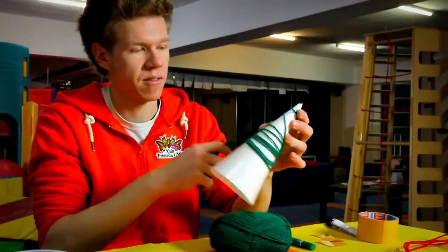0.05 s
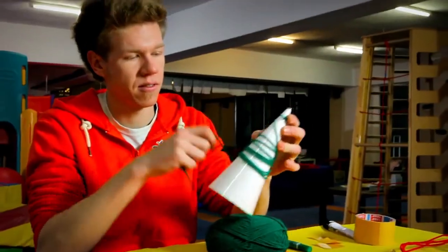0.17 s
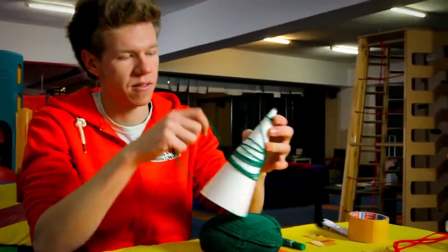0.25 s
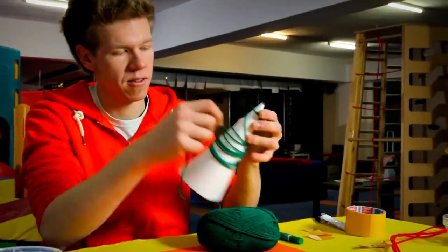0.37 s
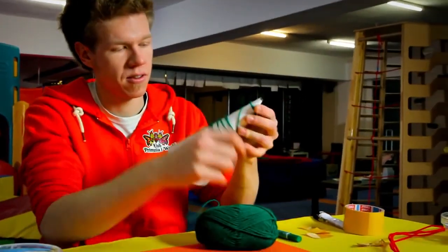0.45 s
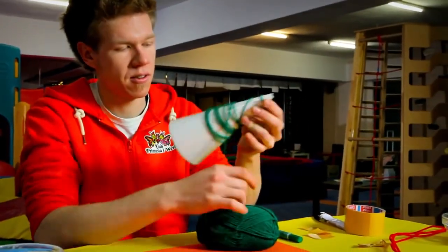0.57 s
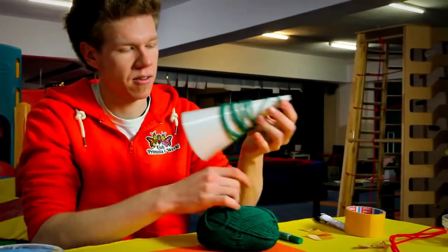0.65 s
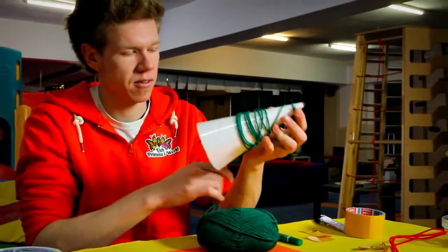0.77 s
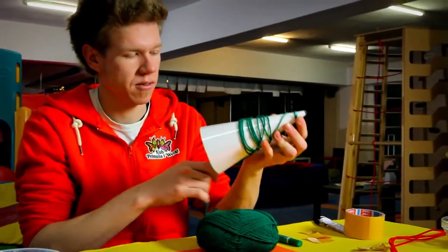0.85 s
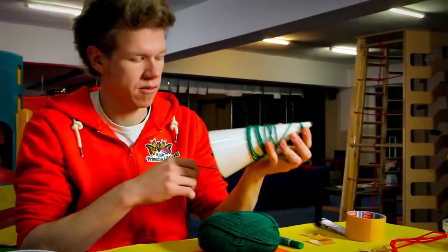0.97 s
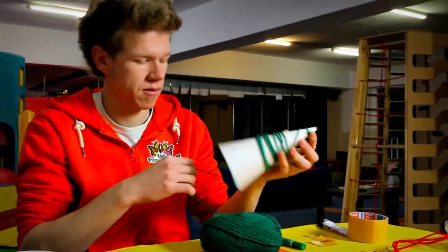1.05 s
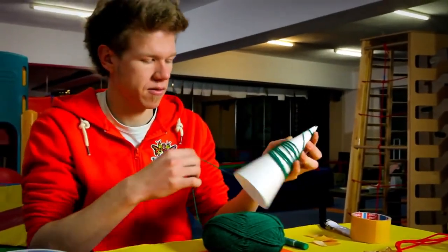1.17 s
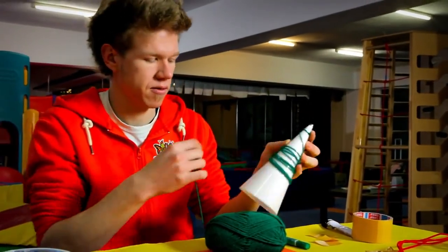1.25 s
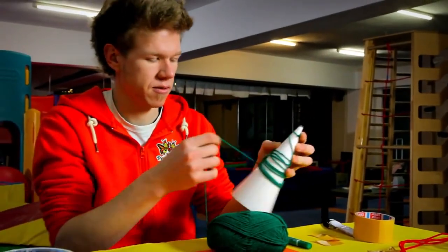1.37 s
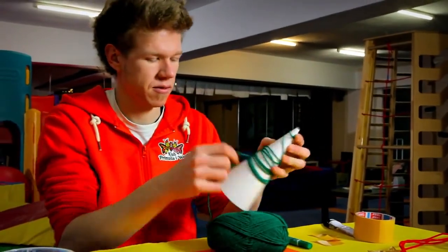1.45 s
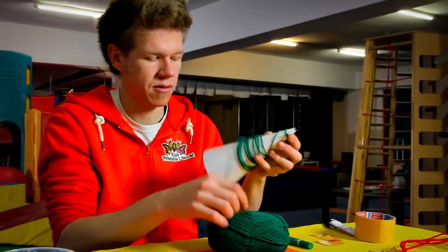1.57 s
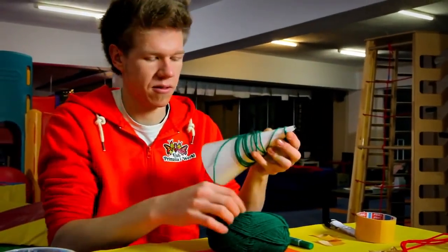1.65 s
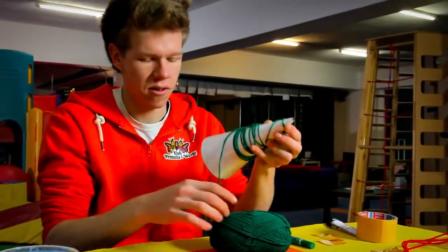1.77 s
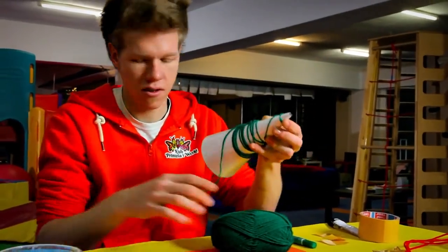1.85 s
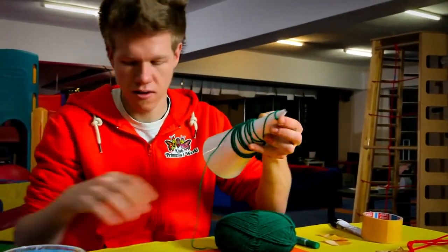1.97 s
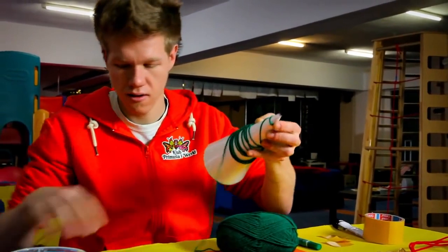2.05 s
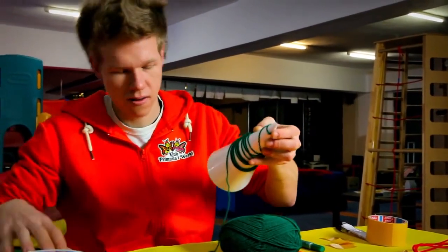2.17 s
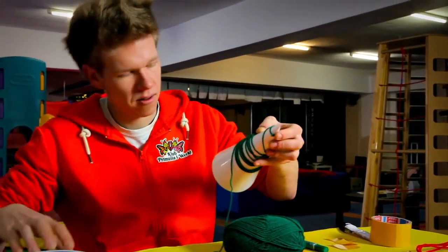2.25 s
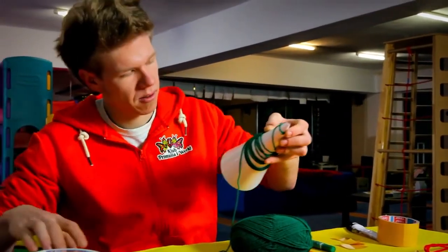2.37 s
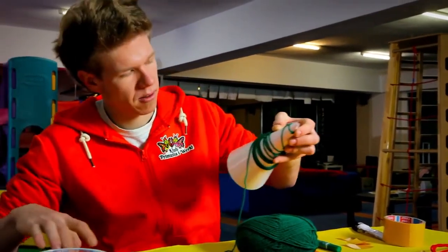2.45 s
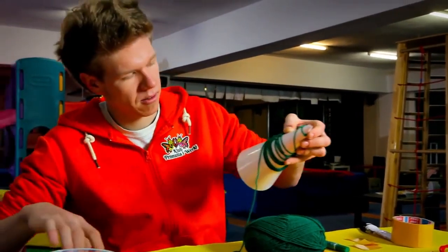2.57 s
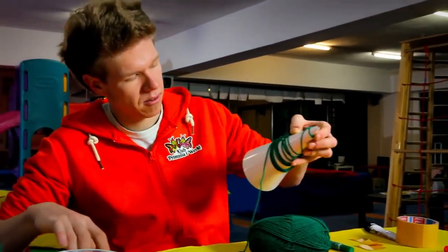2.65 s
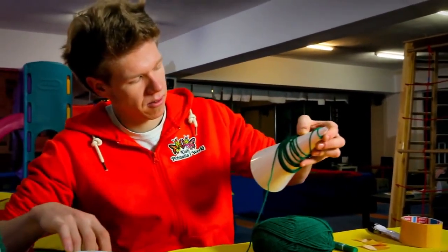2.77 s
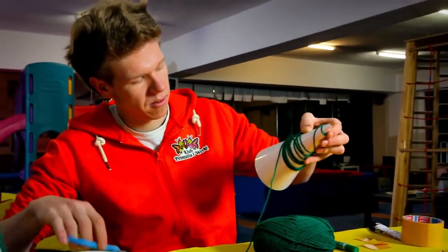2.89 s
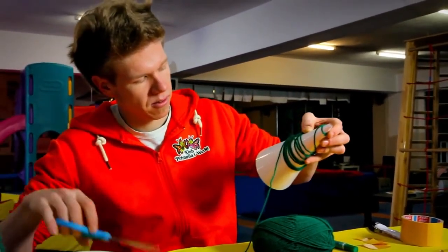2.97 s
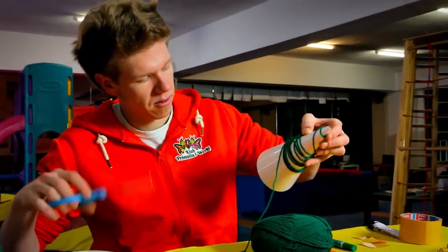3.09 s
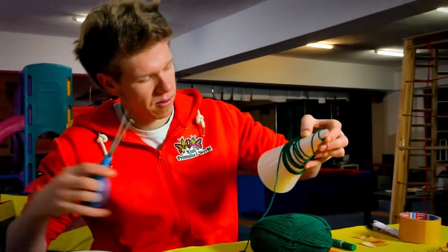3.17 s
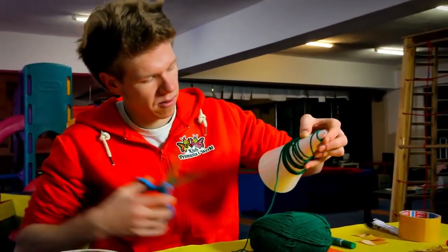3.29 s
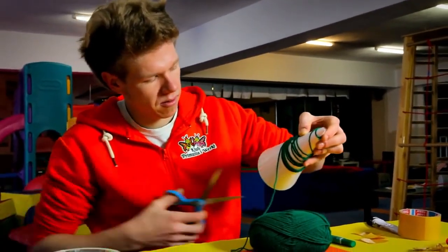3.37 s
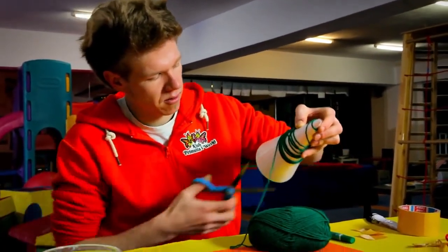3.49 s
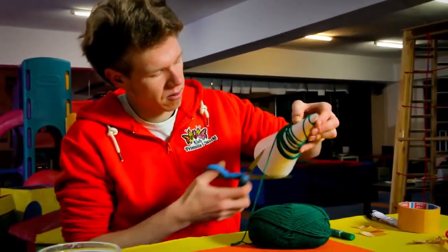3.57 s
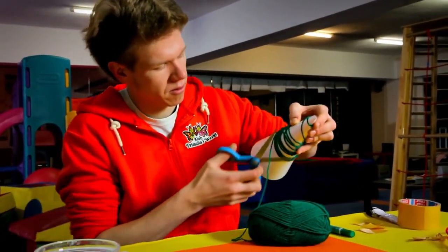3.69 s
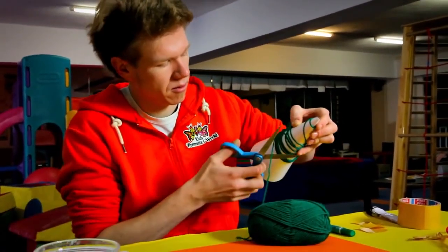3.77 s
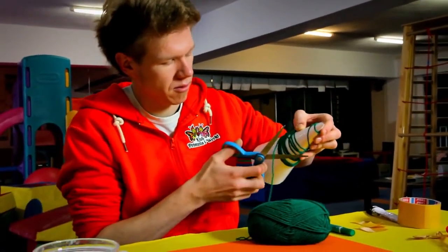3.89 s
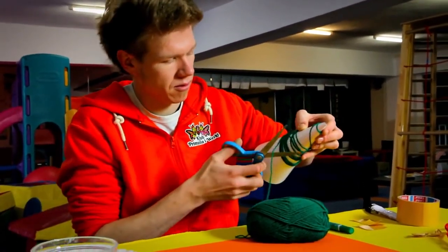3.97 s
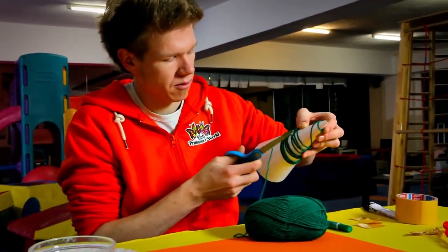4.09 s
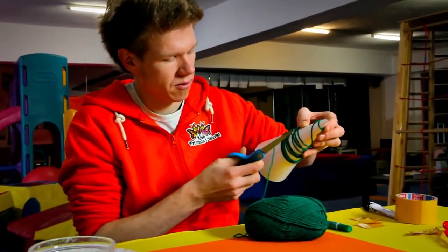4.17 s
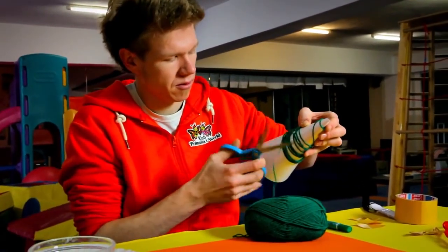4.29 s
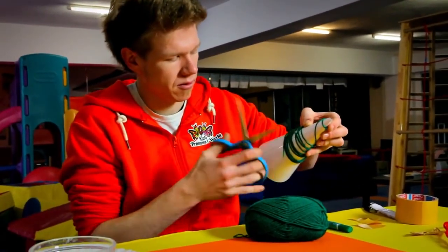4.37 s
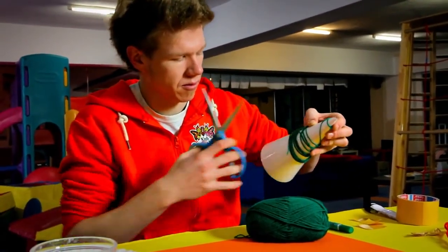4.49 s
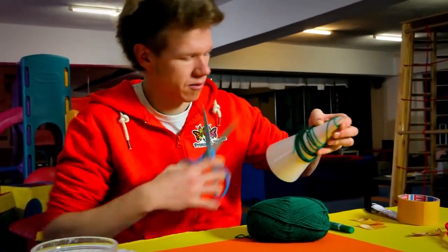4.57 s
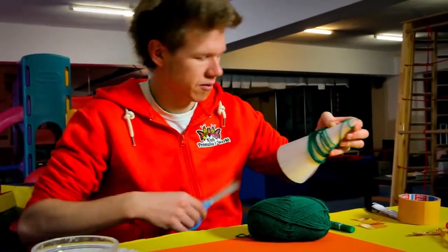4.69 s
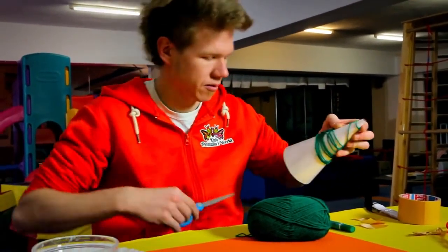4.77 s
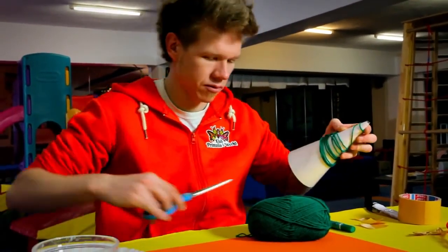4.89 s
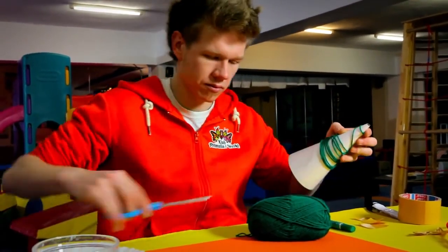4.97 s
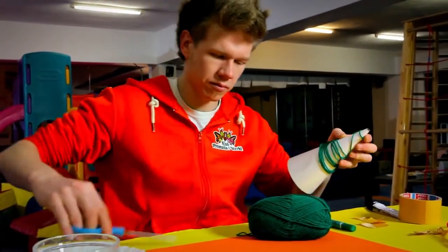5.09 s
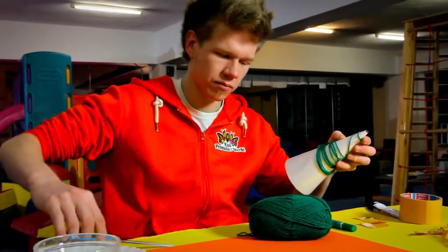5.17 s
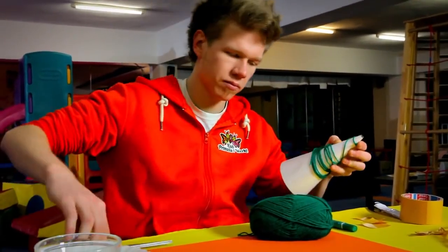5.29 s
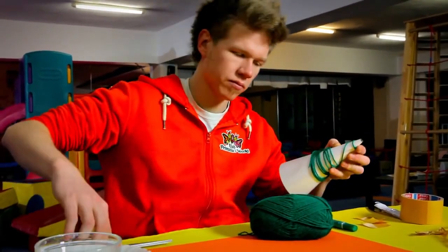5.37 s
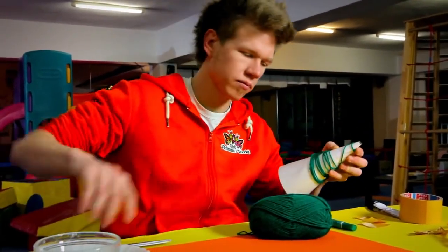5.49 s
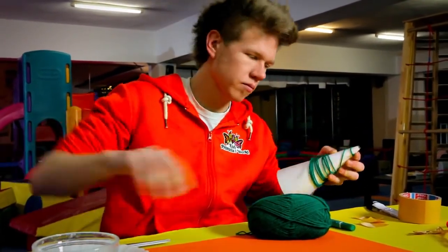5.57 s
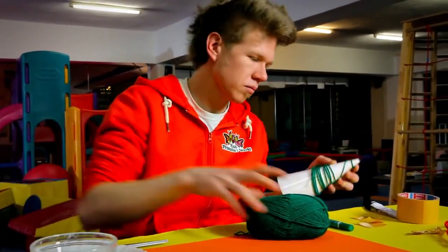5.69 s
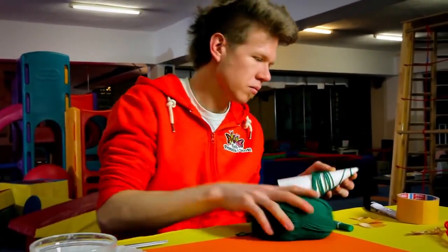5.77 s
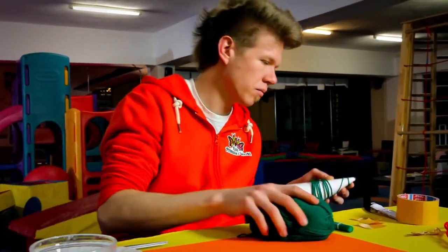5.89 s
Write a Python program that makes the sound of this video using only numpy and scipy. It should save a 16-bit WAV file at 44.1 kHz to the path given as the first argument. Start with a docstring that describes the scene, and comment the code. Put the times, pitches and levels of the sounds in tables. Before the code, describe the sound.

Yarn rubs faintly as it is wound on a paper cone, with a few light taps. Scissors knock and scrape on a table as they are picked up, their steel blades ringing briefly. They snip softly through the yarn, click shut, and are put down with two loud knocks. The sounds are fairly near, slightly left, in a quiet, mildly echoing hall with a steady low hiss and hum.

```python
"""Scissors knock on a craft table in a quiet hall: they are dragged off it with ringing blades, snip
through yarn, click shut, and are put down with two loud knocks. Each impact excites the damped modes
of the table top or the steel blades. Friction, a train of tiny slips, makes the rasp of the edges, the
scuff of the handles and the faint rub of yarn being wound on a paper cone. Cone and handles are tapped.
Soft low thumps sound now and then, over a steady hiss and the hum of lamps and ventilation."""
import sys
import numpy as np
from scipy import signal
from scipy.fft import rfft, irfft, next_fast_len
from scipy.io import wavfile

SR = 44100
rng = np.random.default_rng(int(sys.argv[2]) if len(sys.argv) > 2 else 0)


def store_pcm(level_fs):
    """Save levels as 16-bit WAV."""
    pcm = np.round(np.clip(level_fs, -1, 1) * 32767).astype(np.int16)
    wavfile.write(sys.argv[1], SR, np.atleast_2d(pcm).T)


N = 261865
TIME = np.arange(N) / SR


def table_knocks():
    """Impact excitation: a shorter force pulse sounds brighter, and its place weights the modes."""
    # The scissors strike and bounce. Each row: start in seconds, gain in dB, pulse corner in Hz,
    # gain of the modes in dB, place from 0 (edge) to 1 (middle), clatter t60 in seconds.
    impacts = [(2.264, -32, 513, 8, 0.71, 0.081), (2.2751, -24.5, 450, 3.5, 0, 0.035),
               (2.3178, -30.5, 1290, -28, 0.54, 0.058), (2.3263, -19, 417, -9, 0.3, 0.085),
               (2.675, -24.5, 292, 7, 0.88, 0.053), (5.1881, -19.5, 2250, 6, 0.11, 0.0412),
               (5.2067, -26, 1100, 2, 0.3, 0.039), (5.3529, -11.5, 3820, -0.5, 1, 0.057),
               (5.3535, -10, 15100, -15, 0.62, 0.031), (5.367, -23.5, 9000, -16, 1, 0.025),
               (5.3712, -24, 5000, -10, .5, 0.023), (5.378, -18, 1000, -3.5, 1, 0.029),
               (5.4, -19.5, 1300, -15, 0.36, 0.065)]
    # Modes of the table top with the plastic handles on it. Each row: frequency in Hz,
    # level in dB when struck at the edge, level in dB when struck in the middle, t60 in seconds.
    table_modes = [(130, -43, -37, 0.8), (160, -37, -40, 0.38), (232, -31, -26, 0.27), (390, -42, -29, 0.6),
                   (485, -27, -31, 0.22), (537, -20, -23, 0.09), (563, -32, -24, .18),
                   (639, -25, -26, 0.12), (784, -50, -33, 0.35), (997, -36, -30, 0.25),
                   (1055, -34, -25.5, 0.21), (1097, -17, -20, 0.05), (1282, -50, -33, .3),
                   (1570, -6, -7, .012), (1615, -29, -26, .13), (1671, -31, -27, .14), (1820, -33, -31, .2),
                   (1951, -37, -28, .15), (2560, -17, -9, 0.025), (2990, -19, -10, 0.025)]
    # Spectrum of the clatter. Each row: frequency in Hz, gain in dB.
    clatter_spectrum = [(60, -14), (100, -11), (170, -11), (320, -11), (480, 0.5), (900, -2), (1500, 4),
                        (2100, 2.5), (2900, -3.5), (3500, -6.5), (5000, -9.5), (7500, -7.5), (9500, -13.5),
                        (11500, -32), (15000, -42)]
    out, t = np.zeros((2, N)), TIME[:SR // 100]
    for start, db, corner_hz, ring_db, place, clatter_t60 in impacts:
        modes = [(hz, np.interp(place, [0, 1], [edge, middle]), t60)
                 for hz, edge, middle, t60 in table_modes]
        force = t * np.exp(-2 * np.pi * corner_hz * t)
        response = amp(ring_db) * modal_response(modes) + dense_modes(clatter_spectrum, clatter_t60)
        add(out, start, amp(db) * hall(convolve(response, force / force.sum())))
    return out


def blade_clinks():
    """Free vibration: the loose blades collide and ring on in their bending modes."""
    # Each row: start in seconds, gain in dB, lowest and highest excited frequency in Hz,
    # ring of the upper and of the lower blade in dB.
    contacts = [(2.2624, -22.5, 1450, 4150, -3.5, -8), (2.269, -39, 4570, 6800, -2, -6),
                (2.2735, -37, 4560, 7540, 12, -6), (2.3168, -37, 1090, 7000, 5, 15),
                (2.3216, -24.5, 4000, 4900, -14, -10), (2.6698, -35.5, 1080, 3040, 10.5, -27),
                (2.673, -40.5, 2500, 9000, -27, -20)]
    # Modes of each blade. Each row: frequency in Hz, level in dB, t60 in seconds.
    upper_blade = [(1163, -31.5, 1.3), (1880, -40.5, .9), (2744, -23, .32), (3790, -22, .085),
                   (4890, -23, .085), (6130, -28, .07), (6260, -28, .07), (7560, -28, .09)]
    lower_blade = [(1265, -37, .9), (4452, -35, .15), (6650, -35, .07)]
    # Spectrum of the contact tick. Each row: frequency in Hz, gain in dB.
    tick_spectrum = [(100, -48), (400, -16), (1200, -18), (2400, -2.5), (3900, -0.5), (4700, -3.5),
                     (7500, -1.5), (9000, -3), (12000, -24), (15000, -50)]
    return steel_impacts(contacts, [upper_blade, lower_blade], tick_spectrum, tick_t60=0.015)


def blade_squeak(flutter=0.35, flutter_hz=120):
    """Stick-slip friction: a blade dragged over the table sings unsteadily in its high modes."""
    # The blade presses harder until it slips free.
    # Each row: time of the peak in seconds, level in dB, length in seconds.
    drags = [(2.642, -39, 0.044)]
    # Modes of the pressed blade. Each row: frequency in Hz, relative level in dB.
    pressed_modes = [(1975, 0), (3750, 1.5), (4890, 3), (6180, 0), (7520, -7)]
    lowpass = signal.butter(2, flutter_hz, fs=SR, output="sos")
    squeak = np.zeros(N)
    for hz, db in pressed_modes:
        tremor, phase_drift = flutter * unit_rms(signal.sosfilt(lowpass, rng.standard_normal((2, N))))
        squeak += amp(db) * (1 + tremor) * np.sin(2 * np.pi * hz * TIME + phase_drift)
    return envelope(drags, roundness=0.53) * unit_rms(squeak)


def held_scissors(ring_db=-17):
    """Forced vibration: the sliding edges set the blades ringing; the blades snap shut."""
    # The edges rasp past each other, at pick-up and while snipping; their crossing point sets the pitch.
    # Each row: time of the peak in seconds, level in dB, length in seconds, pitch in Hz.
    edge_slides = [(2.677, -54, .04, 4770), (4.098, -67.5, 0.057, 4100), (4.11, -65, 0.11, 7700),
                   (4.133, -54, 0.024, 9700), (4.15, -60, 0.066, 5460), (4.286, -53, 0.05, 6650),
                   (4.763, -57, 0.037, 7860), (4.79, -62.5, 0.048, 3460)]
    # The blades snap through, shut and rattle at the pivot. Each row: start in seconds, gain in dB,
    # lowest and highest excited frequency in Hz, ring in dB.
    snaps = [(3.324, -48, 2800, 7500, -15), (3.4195, -46, 600, 7000, -18), (3.5655, -39, 6200, 7900, -14),
             (4.1322, -44, 3000, 14000, -10), (4.1345, -39, 300, 13000, 9), (4.148, -41, 1500, 13000, -2),
             (4.2742, -36.5, 2940, 12000, -21), (4.295, -42, 2200, 3000, 1),
             (4.7861, -45, 6000, 13500, -16), (4.7915, -47, 1000, 11000, -16),
             (4.7925, -50, 3000, 3960, 12), (5.291, -51, 2500, 12000, -12)]
    # Blades damped by the hand and by each other; close modes beat.
    # Each row: frequency in Hz, level in dB, t60 in seconds.
    held_modes = [(2320, -16, 0.018), (2430, -18, .025), (3220, -17, .016), (3430, -22, 0.026),
                  (5440, -23, .06), (5600, -26, 0.11), (5692, -24.5, .17), (5755, -26, 0.15),
                  (6000, -24, 0.035), (8300, -22, 0.025)]
    # Spectra of the rasp and of the contact tick. Each row: frequency in Hz, gain in dB.
    rasp_spectrum = [(100, -47), (1000, 0), (2500, 0), (4500, 2.5), (6000, 1.5), (8300, 0.5), (10500, -9.5),
                     (13000, -24), (15000, -39)]
    tick_spectrum = [(100, -34), (400, 1.5), (1000, -7.5), (2500, -0.5), (6000, -5.5), (8400, -1.5),
                     (10500, -13), (13000, -15), (15000, -38)]
    rasp = friction(edge_slides, rasp_spectrum, slips_per_s=5000, spread_db=2.5, hump_db=7, octaves=0.3)
    blades = modal_response(held_modes)
    ringing = amp(ring_db) * convolve(rasp, blades / np.linalg.norm(blades))
    return steel_impacts(snaps, [held_modes], tick_spectrum, tick_t60=0.018) + rasp + ringing


def handle_scuff():
    """Sliding friction: the plastic handles rasp over the table top."""
    # Each row: time of the peak in seconds, level in dB, length in seconds, pitch in Hz.
    slides = [(2.642, -48.5, 0.058, 560), (2.664, -52, 0.051, 1300), (2.697, -59.5, 0.14, 612)]
    # Spectrum of plastic on the table. Each row: frequency in Hz, gain in dB.
    spectrum = [(100, -12), (250, -4), (550, -6.5), (1000, -3.5), (1700, -2), (2600, -10.5), (4500, -9),
                (8000, -16), (11000, -29), (14000, -51)]
    return friction(slides, spectrum, slips_per_s=4000, spread_db=0.5, hump_db=9.5, octaves=0.59)


def yarn_rub():
    """Sliding friction: yarn fibres rasp on the paper cone, and a hand brushes the ball."""
    # Each row: time of the peak in seconds, level in dB, length in seconds, pitch in Hz.
    rubs = [(0.35, -67.5, 0.21, 4370), (0.64, -67.5, 0.18, 2240), (0.773, -55, 0.044, 5270),
            (1.105, -64, 0.21, 7300), (1.16, -65, 0.072, 750), (1.28, -67.5, 0.048, 4800),
            (3.335, -65, 0.099, 900), (3.44, -69, 0.28, 805), (5.89, -62.5, 0.45, 6860)]
    # Spectrum of the rubbing fibres. Each row: frequency in Hz, gain in dB.
    spectrum = [(80, -9), (200, 14), (400, -3), (750, 8), (1200, 2), (2500, 1.5), (5500, -3), (7500, -2),
                (9000, -13.5), (12000, -33)]
    return friction(rubs, spectrum, slips_per_s=2500, spread_db=2.5, hump_db=9, octaves=0.55)


def taps_and_thumps():
    """Damped oscillation: each tap of the cone or handles, and each low thump, is one brief tone."""
    # The hollow cone is tapped. Each row: start in seconds, peak in dB, pitch in Hz.
    cone_taps = [(0.342, -57.5, 680), (1.156, -52, 734), (3.4315, -48.5, 600), (3.4735, -54, 660)]
    # The handles rock on the table. Each row: start in seconds, peak in dB.
    handle_taps = [(2.286, -48.5), (2.327, -48)]
    # Soft low thumps. Each row: start in seconds, peak in dB.
    low_thumps = [(0.831, -66), (0.92, -60), (1.032, -62), (2.068, -60.5), (2.463, -55), (2.57, -52),
                  (3.548, -60), (4.293, -56.5), (4.37, -59.5)]
    faint_low_thumps = [(when * N / SR, -76 + 6.5 * strength) for when, strength in rng.random((22, 2))]
    out = np.zeros(N)
    for start, db, hz in cone_taps:
        add(out, start, damped_tone(db, hz, swell_s=0.002))
    for start, db in handle_taps:
        add(out, start, damped_tone(db, hz=572, swell_s=0.0069))
    for start, db in low_thumps + faint_low_thumps:
        add(out, start, damped_tone(db, hz=146, swell_s=0.0054))
    return out


def modal_response(modes):
    """Modal superposition: a blow leaves decaying sines, neighbours starting in opposite directions."""
    t = TIME[:SR]
    return sum((-1) ** k * amp(db - 60 * t / t60) * np.sin(2 * np.pi * hz * t)
               for k, (hz, db, t60) in enumerate(modes))


def dense_modes(spectrum, t60):
    """Modal overlap: countless quickly dying modes merge into a burst of coloured noise."""
    t = TIME[:SR // 4]
    decay = amp(-60 * t / t60)
    burst = rng.standard_normal(len(t)) * decay
    for _ in range(4):  # flatten the spectrum while keeping the burst short
        flat_spectrum = np.exp(1j * np.angle(rfft(burst)))
        burst = irfft(flat_spectrum, len(t)) * (t < t60)
    burst *= np.linalg.norm(decay)
    return colour(np.pad(burst, (16, 2 * SR)), spectrum)[:SR]


def steel_impacts(contacts, parts, tick_spectrum, tick_t60):
    """Selective excitation: the place of contact picks a band out of the tick and each part's ring."""
    out, rings = np.zeros(N), [modal_response(modes) for modes in parts]
    for start, db, low_hz, high_hz, *rings_db in contacts:
        response = dense_modes(tick_spectrum, tick_t60) + amp(rings_db) @ rings
        band = signal.butter(4, [low_hz, high_hz], "band", fs=SR, output="sos")
        add(out, start, amp(db) * signal.sosfilt(band, response))
    return out


def friction(strokes, spectrum, slips_per_s, spread_db, hump_db, octaves):
    """Shot noise: tiny uneven slips, coloured by the surface and by a hump round each stroke's pitch."""
    strengths = rng.standard_normal(N) * amp(spread_db * np.minimum(rng.exponential(1, N), 3))
    slips = unit_rms(strengths * (rng.random(N) < slips_per_s / SR))
    size = next_fast_len(N)
    surface, hz = rfft(colour(slips, spectrum), size), np.fft.rfftfreq(size, 1 / SR)
    out = np.zeros(N)
    for peak_s, db, length_s, pitch_hz in strokes:
        hump = amp(hump_db * np.exp(-(np.log2((hz + 1) / pitch_hz) / octaves) ** 2))
        rasp = unit_rms(irfft(surface * hump, size)[:N])
        out += envelope([(peak_s, db, length_s)], roundness=1.43) * rasp
    return out


def envelope(strokes, roundness, swell_share=0.37, ends_db=-25.5):
    """Amplitude modulation: strokes swell and fade; roundness 1 gives a pointed top, 2 a bell."""
    gain = np.zeros(N)
    for peak_s, db, length_s in strokes:
        away = np.maximum((peak_s - TIME) / swell_share, (TIME - peak_s) / (1 - swell_share)) / length_s
        gain += amp(db + ends_db * np.minimum(away, 10) ** roundness)
    return gain


def damped_tone(db, hz, swell_s):
    """Damped oscillation: a single sine swells and then dies away."""
    t = TIME[:SR // 4]
    return amp(db) * t / swell_s * np.exp(1 - t / swell_s) * np.sin(2 * np.pi * hz * t)


def hall(x, tail_db=-9.5, build_s=0.0027):
    """Reverberation: direct sound, early reflections, and a diffuse tail whose treble dies first."""
    # Reverberation times. Each row: frequency in Hz, t60 in seconds.
    decay_times = [(100, 0.93), (400, 1), (1000, 0.83), (2000, 0.66), (3000, 0.49), (4000, 0.6),
                   (8000, 0.4), (14000, 0.28)]
    # Reflections from nearby surfaces. Each row: delay in seconds, gain in dB.
    reflections = [(.0068, -18), (0.0112, -17), (0.0174, -15.5), (.0208, -18)]
    hz, t, noise = signal.stft(rng.standard_normal((2, SR)), SR, nperseg=256)
    decay = amp(-60 * t / curve_at(decay_times, hz)[:, None])
    tails = signal.istft(noise * decay, SR, nperseg=256)[1][:, :SR]
    tails *= 1 - np.exp(-(TIME[:SR] / build_s) ** 2)
    response = stereo_pair(*tails, correlation=0.5) * amp(tail_db) / np.linalg.norm(tails[0])
    response[:, 0] += 1  # direct sound
    for delay, db in reflections:
        response[:, round(delay * SR)] += amp(db)
    return np.array([convolve(x, side) for side in response])


def background(hiss_db=-63.73, lean_left_db=0.37):
    """Stationary noise: a broadband hiss under the faint tones of lamps and ventilation."""
    # Spectral density of the hiss. Each row: frequency in Hz, relative level in dB.
    hiss_spectrum = [(15, -21), (30, -3.5), (55, -1), (85, -5.5), (105, -22), (155, -20.5), (190, -6),
                     (330, -8), (700, -12), (1600, -16), (6200, -21), (8500, -28.5), (11600, -39),
                     (13000, -59)]
    # Tones of the hum. Each row: frequency in Hz, rms level in dB.
    hum_tones = [(48.4, -73.5), (210, -80.5), (883, -82)]
    noise = stereo_pair(*rng.standard_normal((2, N)), correlation=0.32)
    hiss = unit_rms(colour(noise, hiss_spectrum)) * amp(hiss_db)
    hum = sum(amp(db) * np.sqrt(2) * np.sin(2 * np.pi * (hz * TIME + rng.random()))
              for hz, db in hum_tones)
    return (hiss + hum) * amp([[lean_left_db], [-lean_left_db]])


def stereo_pair(a, b, correlation):
    """Partial coherence: two channels from the sum and difference of two unrelated signals."""
    mid, side = a * np.sqrt((1 + correlation) / 2), b * np.sqrt((1 - correlation) / 2)
    return np.array([mid + side, mid - side])


def amp(db):
    return 10 ** (np.asarray(db) / 20)


def unit_rms(x):
    return x / np.sqrt(np.mean(x ** 2) + 1e-20)


def curve_at(points, hz):
    """Interpolates a table on a log-frequency axis."""
    frequencies, values = np.transpose(points)
    return np.interp(np.log(hz + 1), np.log(frequencies + 1), values)


def colour(x, spectrum, share=1):
    """Zero-phase filtering by a share of a spectrum in dB."""
    size = x.shape[-1]
    return irfft(rfft(x) * amp(share * curve_at(spectrum, np.fft.rfftfreq(size, 1 / SR))), size)


def convolve(x, response):
    return signal.fftconvolve(x, response)[:N]


def add(mix, start_s, sound):
    part = mix[..., round(start_s * SR):][..., :sound.shape[-1]]
    part += sound[..., :part.shape[-1]]


def scene(bass_hz=90):
    """Superposition: the sources sound in the hall, a little to the left, over the background."""
    # Level difference between the channels. Each row: frequency in Hz, left minus right in dB.
    left_lead = [(150, -1), (370, 2.5), (2300, 3.5), (4300, 2.5), (8000, 1)]
    sources = table_knocks() + hall(handle_scuff() + held_scissors() + yarn_rub() + taps_and_thumps())
    sources += hall(blade_clinks() + blade_squeak(), tail_db=-13)  # these get less reverberation
    highpass = signal.butter(4, bass_hz, "high", fs=SR, output="sos")  # small things radiate little bass
    left, right = signal.sosfilt(highpass, sources)
    return np.array([colour(left, left_lead, 1 / 2), colour(right, left_lead, -1 / 2)]) + background()


def record(dry, edge_hz=15000):
    """Band limiting: a low-pass filter cuts the top treble, and each channel gains a steady offset."""
    # Each row: the offset of one channel as a fraction of full scale, left first.
    offsets = [
        [-.01345],
        [.0159],
    ]
    lowpass = signal.firwin(255, edge_hz, window=("kaiser", 8), fs=SR)
    return signal.oaconvolve(dry, lowpass[None], "same") + offsets


dry = scene()
out = record(dry)
store_pcm(out)
```